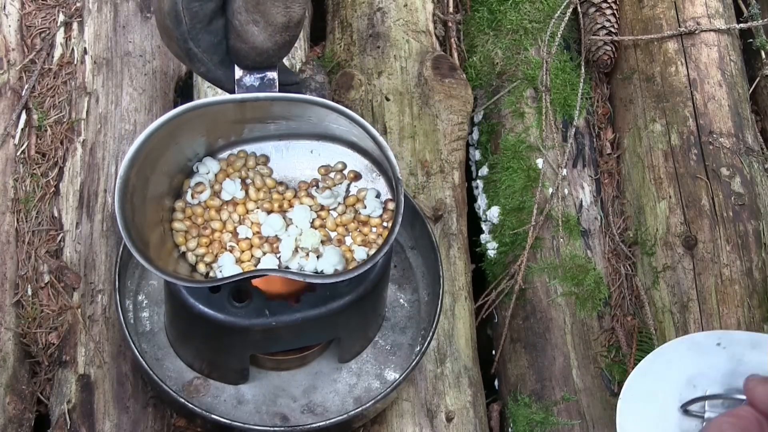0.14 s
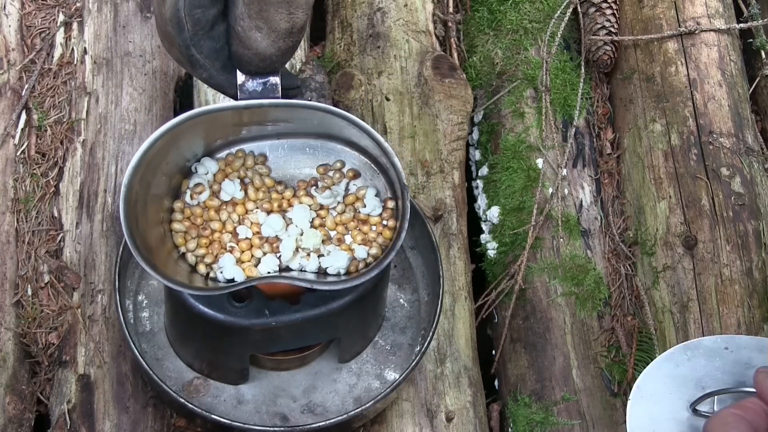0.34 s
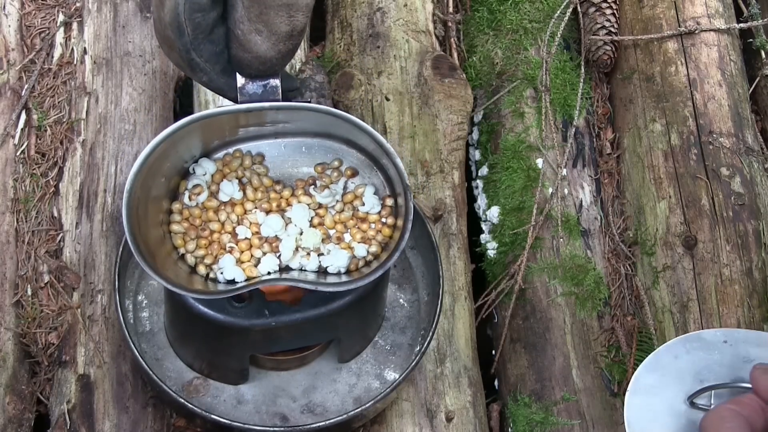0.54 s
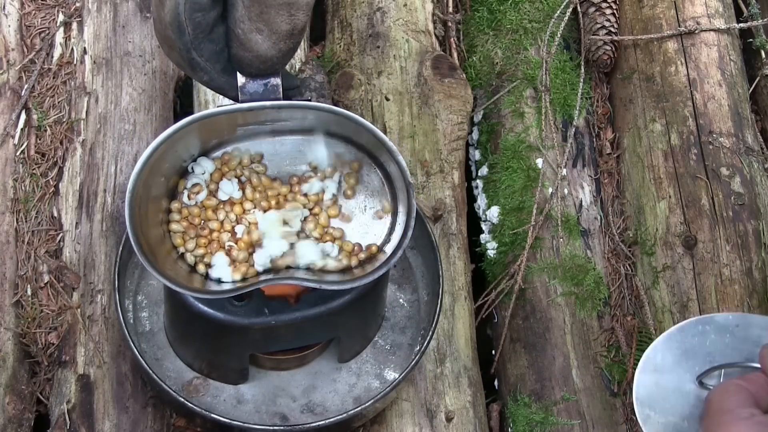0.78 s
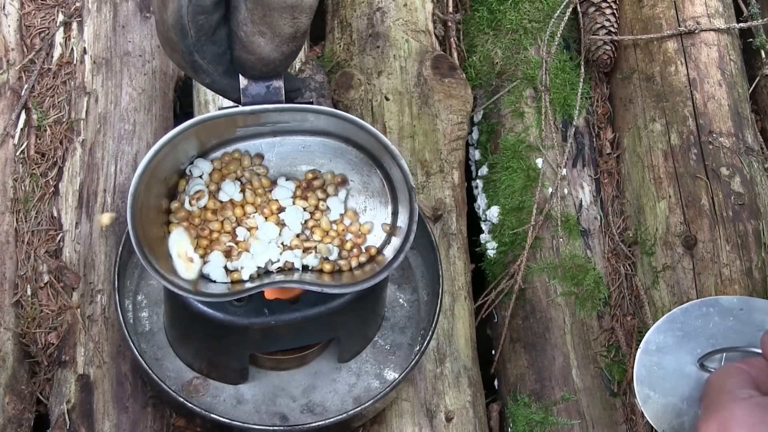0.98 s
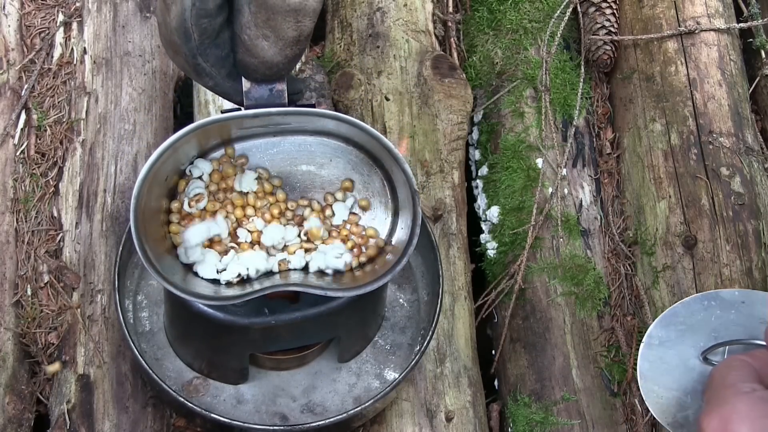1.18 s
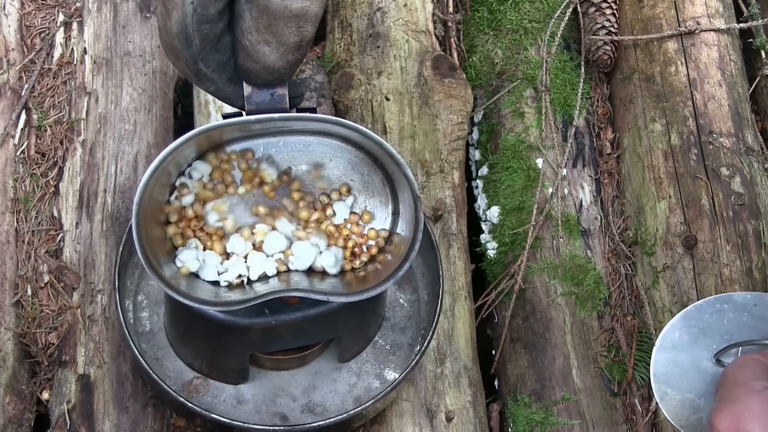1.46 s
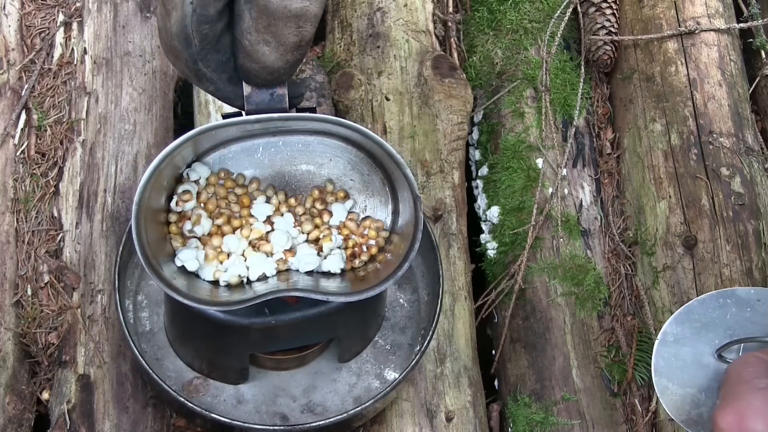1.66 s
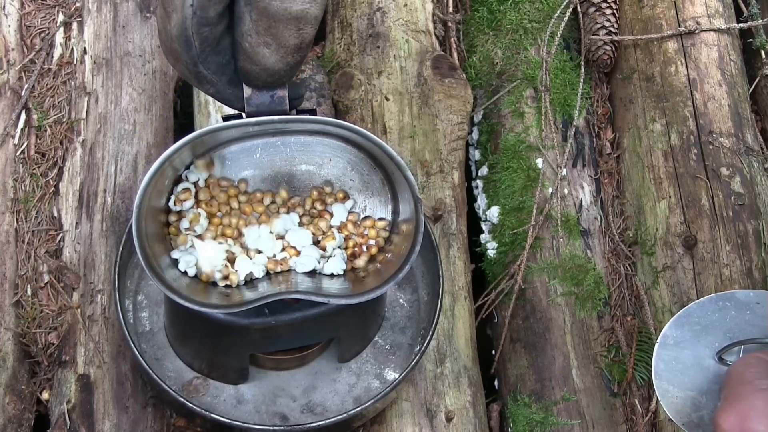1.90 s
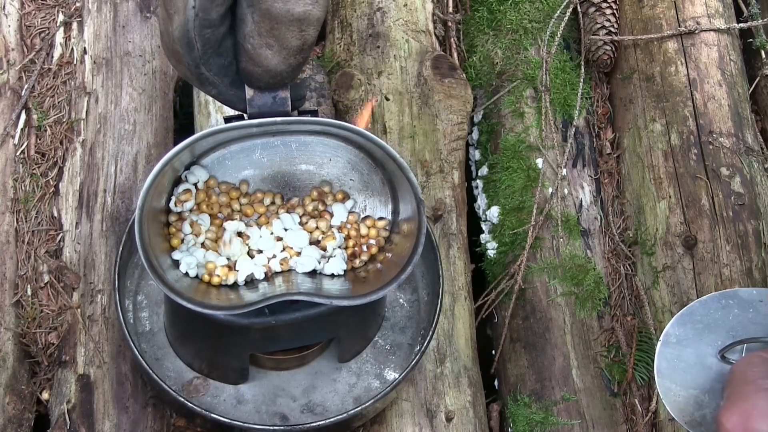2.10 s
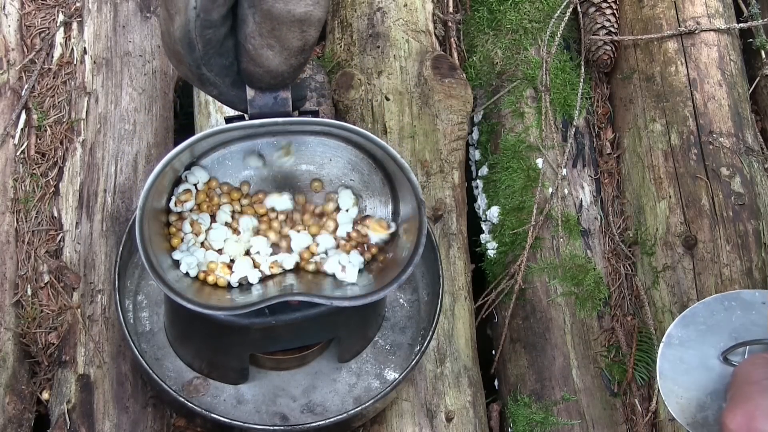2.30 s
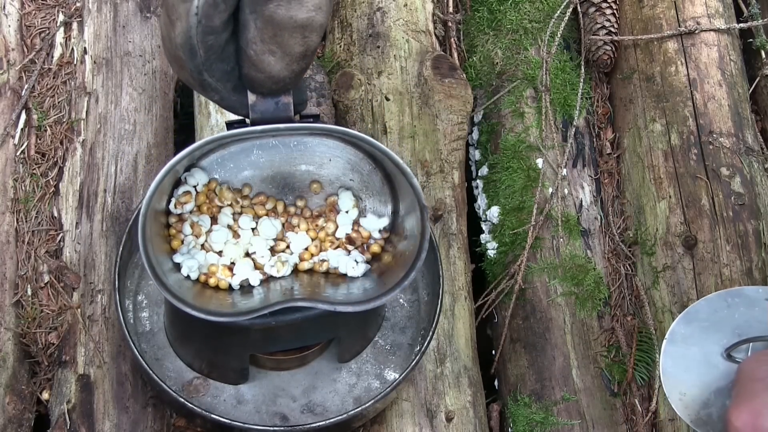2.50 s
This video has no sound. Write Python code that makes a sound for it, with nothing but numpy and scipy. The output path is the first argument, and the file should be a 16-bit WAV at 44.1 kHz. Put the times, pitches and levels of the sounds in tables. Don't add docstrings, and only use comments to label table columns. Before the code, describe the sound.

Popcorn pops in a small open steel pot outdoors, heard very close: kernels rattle, a faint steam squeak, then clusters of hard, dry cracks with kernels clinking back onto metal over quiet sizzling.

```python
import sys
import numpy as np
from scipy import signal
from scipy.io import wavfile
from scipy.ndimage import uniform_filter1d

SR = 44100
rng = np.random.default_rng(int(sys.argv[2]) if len(sys.argv) > 2 else 0)


def volts(x):
    e = np.asarray(x, float) / 20
    return 10 ** e


def generate_wav(sig):
    pcm = np.round(np.clip(np.atleast_2d(sig).T, -1, 1) * 32767).astype(np.int16)
    wavfile.write(sys.argv[1], SR, pcm)


N = 116865


def fade(t60, size):
    return volts(-60 * np.arange(size) / SR / t60)


def ring(x, hz, t60):
    radius = volts(-60 / (t60 * SR))
    angle = 2 * np.pi * hz / SR
    return signal.lfilter([0, radius * np.sin(angle)], [1, -2 * radius * np.cos(angle), radius * radius], x)


def band(x, lo_hz, hi_hz):
    return signal.sosfilt(signal.butter(2, [lo_hz, min(hi_hz, .45 * SR)], "band", fs=SR, output="sos"), x)


def high_pass(x, order, hz):
    return signal.sosfilt(signal.butter(order, hz, "high", fs=SR, output="sos"), x)


def unit(x):
    return x / np.sqrt(np.mean(x ** 2))


def walk(rate):
    hold = int(SR / rate)
    steps = np.repeat(rng.standard_normal(N // hold + 1), hold)
    return unit(uniform_filter1d(uniform_filter1d(steps, hold), hold)[:N])


def add(out, t, x):
    i = max(int(t * SR), 0)
    out[i:i + len(x)] += x[:N - i]


SIDE_S = 0.0025


def place(out, t, x):
    scatter = rng.standard_normal(300) * fade(SIDE_S, 300)
    add(out[0], t, x)
    add(out[1], t, signal.fftconvolve(x, scatter / np.linalg.norm(scatter)))


# (frequency [Hz], level per Hz [dB])
SIZZLE = [(18, -39), (30, -16), (114, -15.5), (182, -6.5), (230, -6), (332, -1), (2130, -15.5), (8280, -16),
          (15500, -21.5)]
# (frequency [Hz], width [Hz], level [dB])
SIZZLE_PEAKS = [
    (3940, 480, -65.5),
    (7840, 1350, -59.5),
]
SIZZLE_DB = -50.5


def sizzle():
    spectrum, out, swell = np.array(SIZZLE), 0, walk(1.1)
    wide = np.array([[1], [-1]])
    for hz in 30 * 2 ** np.arange(0, 9.3, .5):
        mid, side = band(rng.standard_normal((2, N)), hz * 0.8, hz * 1.23)
        db = np.interp(np.log(hz), np.log(spectrum[:, 0]), spectrum[:, 1])
        db = db + .8 * swell + 1.4 * walk(12)
        width = .5 * min(hz / 250, 1.2)
        out = out + volts(db) * (mid + width * side * wide)
    out = unit(out) * volts(SIZZLE_DB)
    for hz, width_hz, db in SIZZLE_PEAKS:
        mid, side = unit(band(rng.standard_normal((2, N)), hz - width_hz / 2, hz + width_hz / 2))
        out = out + volts(db + 2.5 * walk(14.9)) * (mid + 0.18 * side * wide)
    return out


# (time [s], pitch [Hz], level [dB])
WHISTLE = [
    (0.59, 4350, -70),
    (0.605, 4650, -56),
    (.628, 5150, -55),
    (.64, 4500, -59),
    (0.655, 3550, -59),
    (.69, 3270, -61),
    (.712, 3580, -52),
    (.735, 3800, -57),
    (.79, 3500, -68),
]


def whistle():
    rows, t = np.array(WHISTLE), np.arange(N) / SR
    hz = np.interp(t, rows[:, 0], rows[:, 1]) * (1 + 0.0093 * walk(300))
    db = np.interp(t, rows[:, 0], rows[:, 2], left=-200, right=-200)
    tone = np.sin(2 * np.pi * np.cumsum(hz) / SR)
    breath = volts(-5.0) * unit(band(rng.standard_normal(N), 4000, 5500))
    return volts(db + 5.5 + 0.99 * walk(69.4)) * (tone + breath)


# (frequency [Hz], level [dB], t60 [s])
STEEL = [(620, 1, 0.063), (1022.5, -0.5, 0.05), (1207, 5.5, 0.018), (1610, -2.5, 0.075), (1942, -6, 0.1),
         (2220, -0.5, 0.017), (3060, -3, 0.078), (3510, -13, 0.13), (3710, 7, 0.01), (4080, -10, 0.089),
         (4585, -8, 0.057), (5040, -9, 0.065), (6200, -14, 0.071), (6900, -22, 0.022)]
FOCUS_DB_PER_OCT, TAP_SPREAD_DB = 9, 2.5


def steel(push, focus_hz, spread):
    out = 0
    for (hz, db, t60), s in zip(STEEL, spread):
        off_focus_db = FOCUS_DB_PER_OCT * abs(np.log2(hz / focus_hz))
        out = out + volts(db - off_focus_db + TAP_SPREAD_DB * s) * ring(push, hz, t60)
    return out


# (time [s], level [dB])
SHUFFLE = [
    (0.0, -55),
    (1.15, -54),
    (1.25, -55.5),
    (2.07, -55.5),
    (2.65, -63),
]
STIR_DB, STIR_T60_S = -51.5, 0.67
AIR_HZ, AIR_T60_S = 710, 0.031


def shuffle():
    rows, stir = np.array(SHUFFLE), np.zeros(N)
    for t, db, _, _ in CRACKS:
        add(stir, t, volts(STIR_DB + db) * fade(STIR_T60_S, SR // 2))
    contacts = rng.random((2, N)) < 900 / SR
    push = rng.standard_normal((2, N)) * contacts * volts(2.8 * walk(39.83))
    wall = unit(steel(push, 890, np.zeros(len(STEEL))))
    air = volts(2.5) * unit(ring(push, AIR_HZ, AIR_T60_S))
    rustle = volts(5.5) * unit(band(push + 0.088 * rng.standard_normal((2, N)), 1100, 6300))
    level = volts(np.interp(np.arange(N) / SR, rows[:, 0], rows[:, 1]) - 9.5) + stir
    return level * (wall + air + rustle)


# (time [s], peak level [dB], lowest frequency [Hz])
PUFFS = [
    (0.821, -34, 120),
    (1.154, -30.5, 90),
    (1.17, -36, 90),
    (1.4952, -29.5, 30),
    (1.531, -36.5, 40),
    (1.851, -29, 30),
    (2.014, -30.5, 30),
    (2.185, -28.5, 204),
    (2.291, -34, 30),
]


def thumps():
    out = np.zeros(N)
    for t, db, hz in PUFFS:
        puff = volts(db) * fade(0.0095, size=3000) * (1 - fade(0.00033, size=3000))
        add(out, t, signal.lfilter(*signal.butter(2, hz, "high", fs=SR), puff))
    return out


# (time [s], frequency [Hz], level [dB], t60 [s])
RINGS = [(.002, 3066, -25.5, 0.023), (.031, 1985, -43.5, 0.2), (.075, 1606, -40.5, 0.056),
         (.114, 757, -37, 0.027), (.063, 2900, -30.5, .02), (1.039, 999, -33.5, 0.14),
         (1.039, 1593, -24.5, 0.061), (1.039, 3680, -23, 0.023), (1.039, 3521, -46, 0.18),
         (1.093, 1960, -37, 0.056), (1.093, 707, -34.5, 0.035), (1.491, 1110, -29, 0.055),
         (1.495, 2420, -20, .025), (1.52, 3060, -26, 0.033), (1.673, 3510, -42, 0.64),
         (1.673, 3710, -16, 0.022), (1.675, 1604, -22.5, 0.059), (1.677, 1004, -35.5, 0.16),
         (1.678, 3074, -29, 0.026), (1.678, 4900, -30, 0.073), (1.709, 3030, -35.5, 0.064),
         (1.728, 1620, -37, 0.042), (2.374, 1940, -30, .04), (1.761, 1600, -41, 0.046),
         (1.851, 998, -36, 0.026), (1.948, 1610, -44, 0.06), (1.948, 3510, -37, 0.11),
         (2.015, 1970, -25, 0.036), (2.021, 2010, -24.5, 0.041), (2.099, 3510, -42, .1),
         (2.187, 990, -24, 0.046), (2.192, 1960, -18, 0.023), (2.444, 1870, -38, .05),
         (1.578, 2016, -41, 0.13), (2.392, 3580, -36, .03)]


def rings():
    out, size = np.zeros((2, N)), 14000
    click = np.eye(1, size)[0]
    for t, hz, db, t60 in RINGS:
        place(out, t, volts(db) * ring(click, hz, t60) * (1 - fade(0.01, size)))
    return out


# (time [s], peak level [dB], scatter
# length [s], rustle level [dB], favoured pitch [Hz])
TAPS = [(0.0, -24, 0.014, -2.5, 3060), (0.012, -27.5, 0.018, 5, 640), (0.0625, -30, 0.008, -7, 2650),
        (0.518, -35, 0.0017, -16, 1360), (0.868, -22.5, 0.017, -6, 760), (0.902, -25.5, 0.016, -1.5, 1010),
        (0.9256, -21.5, 0.011, 0, 3680), (0.9372, -9.5, 0.012, -9, 4100),
        (0.9554, -16.5, 0.041, -6.5, 3060), (0.9875, -23.5, 0.011, -13, 696), (1.206, -25, 0.0054, 9, 2480),
        (1.2255, -25, 0.005, 1, 696), (1.2565, -21.5, 0.01, -3, 3560), (1.329, -32.5, 0.015, -2, 614),
        (1.518, -54, 0.011, 18, 740), (1.5546, -20, 0.0037, -2, 2870), (1.578, -25, 0.0086, -6, 1900),
        (1.6104, -16.5, 0.016, 2, 3060), (1.6537, -21.5, 0.0052, -1.5, 3710),
        (1.762, -31.5, 0.016, 0.9, 1630), (1.897, -28, 0.013, 1.5, 1970),
             (1.915, -20.5, 0.0036, 1.8, 2930), (1.9291, -23, 0.022, 1.8, 2970),
             (1.9475, -23, 0.015, 1, 1610), (2.006, -35, 0.0054, 2, 3490), (2.021, -53, 0.0096, 2, 1940),
             (2.0822, -37, 0.014, 2, 670), (2.0986, -26.5, 0.0049, 1.6, 3510),
             (2.3501, -35.5, 0.016, 2.2, 3500), (2.3735, -22, 0.007, 1, 2900),
             (2.3922, -25.5, 0.0039, 1.2, 3510), (2.4036, -25.5, 0.0067, 3.9, 1480),
             (2.4426, -32, 0.0092, 1.5, 1920), (2.464, -31, 0.014, 1.8, 1040)]
# (time [s], peak level [dB], scatter length [s], rustle level [dB], favoured pitch [Hz])
CREAK = [
    (1.84, -35, 0.0066, 9.2, 5540),
    (2.202, -27, 0.0051, 5.6, 4960),
]
# (time [s], peak level [dB], scatter length [s], rustle level [dB], favoured pitch [Hz])
CLINKS = [
    (1.0381, -16, 0.0071, -0.5, 1370),
    (1.0921, -22.5, 0.0036, -20, 1360),
    (1.6727, -12.5, 0.011, -3.5, 3770),
    (1.676, -16, 0.017, -12, 1385),
]
TAP_DB, TAP_HISS_DB = -12, -1.5
FIRST_CONTACT = 0.68


def taps():
    out, size = np.zeros((2, N)), 9000
    for rows, loose in ((CLINKS, .2), (TAPS + CREAK, 1)):
        for t, db, length, rustle_db, hz in rows:
            noise, spread = rng.standard_normal((3, size)), rng.standard_normal(len(STEEL))
            shape = np.exp(-np.arange(size) / SR / max(length, .0003))
            scatter = noise[0] ** 3 * shape
            contact = FIRST_CONTACT * np.eye(1, size)[0]
            push = loose * scatter / np.linalg.norm(scatter) + contact
            grit = noise[1] * volts(12.5 * uniform_filter1d(noise[2], size=20))
            edges = hz * .5, min(hz * 2.61, 9000)
            hiss = unit(band(band(grit, *edges), *edges)) * shape * (1 - fade(.005, size))
            wall = steel(push, hz, loose * spread)
            place(out, t, volts(db + TAP_DB) * (wall + volts(TAP_HISS_DB + rustle_db) * hiss))
    return out


SNAP_CYCLES, SNAP_CYCLES_PER_DB = 3.2, .22


def snap(hz, cycles, size):
    phase = np.arange(size) * hz / SR
    envelope = np.sin(np.pi * np.clip(phase / cycles, 0, 1) ** .6)
    return -np.sin(2 * np.pi * phase) * envelope


# (time [s], peak level [dB], pitch [Hz], pot air level [dB])
CRACKS = [(0.8247, -6.5, 4700, -15), (.8317, -9, 4850, -18.5), (0.8546, -8.5, 6400, -27.5),
          (1.14, -15, 5900, -22.5), (1.1519, -11, 7140, -30), (1.1535, -8, 6800, -19.5),
          (1.1699, -1, 4730, -13.5), (1.4864, -17.5, 6900, -56), (1.4913, -10, 7600, -24.5),
          (1.4943, -3, 6370, -49), (1.5032, -13, 5500, -26), (1.5298, -4, 7950, -21.5),
          (1.6011, -20, 5040, -36.5), (1.8453, -13, 5500, -27), (1.8466, -18, 5300, -45),
          (1.8497, -0.5, 5270, -13), (2.0139, -2.5, 8600, -23.5), (2.1404, -15, 7950, -62),
          (2.1862, -11.5, 5100, -13.5), (2.2093, -22, 6900, -54), (2.217, -18, 5440, -33),
          (2.2224, -13.5, 5100, -22.5), (2.284, -8, 5270, -14), (2.2878, -17, 7000, -31),
          (2.2898, 1, 6900, -13.5)]
# (time [s], peak level [dB], pitch [Hz], pot air level [dB])
SPLITS = [(.826, -19, 7000, -48), (1.849, -22, 6000, -42), (1.488, -21, 8000, -56),
          (1.4902, -13, 5000, -22.5), (1.5062, -18, 4000, -26.5), (1.5345, -25, 5000, -34),
          (1.8435, -24, 5500, -34), (1.8507, -5.5, 7660, -13), (2.0152, -21, 8400, -50),
          (2.1822, -32, 6000, -62), (2.1902, -33, 7000, -44), (2.215, -27, 6000, -29),
          (2.2843, -9.5, 7700, -30), (2.2967, -20, 8200, -34)]
# (time [s], peak level [dB], pitch [Hz], pot air level [dB])
DRY_CRACKS = [
    (.8101, -9, 7140, -22),
    (.814, -9, 8400, -39),
    (.8156, -6, 7660, -24),
    (.8165, -5.5, 7400, -26),
    (.8187, -2, 5900, -15),
]
# (time [s], pitch [Hz])
AIR = [
    (.8, 707),
    (1.2, 705),
    (1.47, 790),
    (1.51, 770),
    (1.53, 724),
    (1.85, 685),
    (2.19, 689),
    (2.29, 734),
]
BURST_DB, BURST_GROWTH, BURST_T60_S = -4, .55, 0.01
DEBRIS_DB, DEBRIS_T60_S = -22.5, 0.071
RIM_HZ, RIM_T60_S, RIM_DB = 3526, 0.027, -21.5
CRACK_STEEL_DB, TICK_DB = -27.5, -13


def cracks(rows, steam_db=0):
    out, size = np.zeros((2, N)), 6000
    click = np.eye(1, size)[0]
    tick = volts(TICK_DB) * np.diff(click, prepend=0)
    for t, db, hz, air_db in rows:
        noise, spread = rng.standard_normal((3, size)), rng.standard_normal(len(STEEL))
        crack = 1.4 * snap(hz, max(SNAP_CYCLES + SNAP_CYCLES_PER_DB * db, 1.4), size)
        swell = fade(BURST_T60_S, size) * (1 - fade(.004, size))
        steam = unit(band(noise[0], hz * 0.24, hz * 1.68)) * swell
        burst = volts(steam_db + BURST_DB + BURST_GROWTH * db) * steam
        grit = noise[1] * volts(10 * uniform_filter1d(noise[2], size=12))
        debris = unit(band(band(grit, 1240, 14000), 1050, 7600)) * fade(DEBRIS_T60_S, size)
        debris = volts(DEBRIS_DB) * debris
        rim = volts(RIM_DB) * ring(click, RIM_HZ, RIM_T60_S)
        wall = volts(CRACK_STEEL_DB) * steel(click, 1320, spread)
        air_hz = np.interp(t, *np.array(AIR).T) * (1 + spread[0] / 100)
        air = -volts(air_db) * ring(click, air_hz, AIR_T60_S)
        place(out, t, volts(db) * (crack + tick + burst + debris + rim + wall) + air)
    return out


POT_FLOOR_HZ = 592
ECHO_S, ECHO_DB, ECHO_HZ, ECHO_PAN_DB = .0069, -9, 6000, 6.5
PAN_DB, PUFF_PAN_DB, SIDE_DB = 0.55, 5, -7.5


def scene():
    pot = shuffle() + rings() + taps() + cracks(SPLITS) + cracks(DRY_CRACKS, steam_db=-4) + cracks(CRACKS)
    mid, side = high_pass(pot, 4, POT_FLOOR_HZ)
    mid = mid + whistle()
    echo = volts(ECHO_DB) * band(np.roll(mid, int(ECHO_S * SR)), ECHO_HZ, 12000)
    side = band(side, 1250, 13200) * volts(SIDE_DB)
    pan = np.array([[.5], [-.5]])
    direct = mid * volts(PAN_DB * pan) + 2 * pan * side
    return sizzle() + thumps() * volts(PUFF_PAN_DB * pan) + echo * volts(ECHO_PAN_DB * pan) + direct


def roll_off(x):
    return signal.sosfilt(signal.butter(12, 16450, fs=SR, output="sos"), x)


TOP_HZ = 11320


def record(dry):
    soft = signal.sosfilt(signal.butter(3, TOP_HZ, fs=SR, output="sos"), dry)
    return roll_off(np.clip(soft, -1, 1))


dry = scene()
out = record(dry)
generate_wav(out)
```